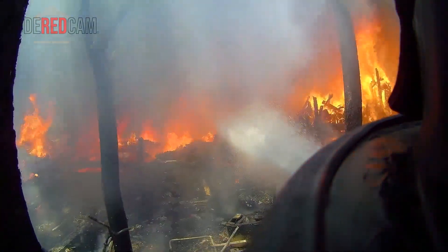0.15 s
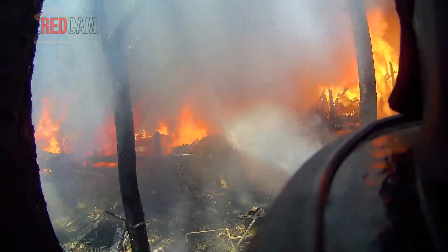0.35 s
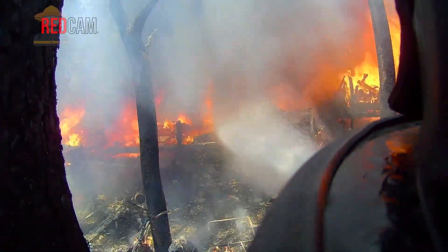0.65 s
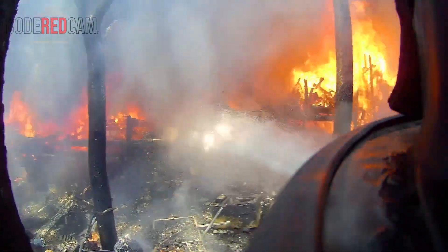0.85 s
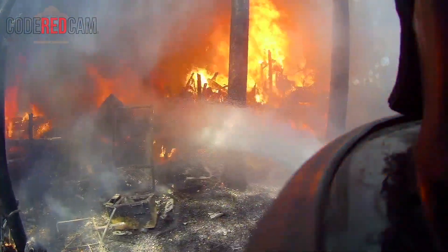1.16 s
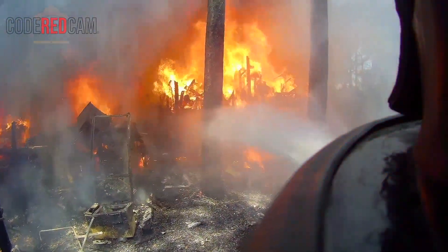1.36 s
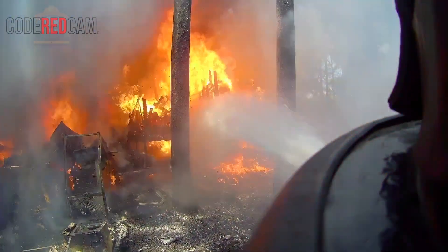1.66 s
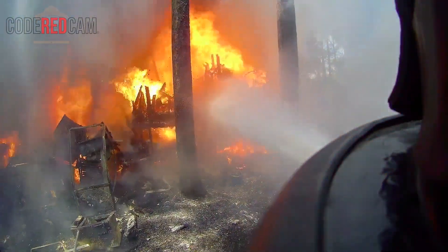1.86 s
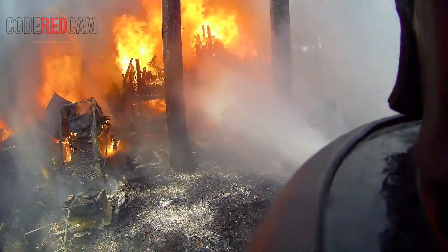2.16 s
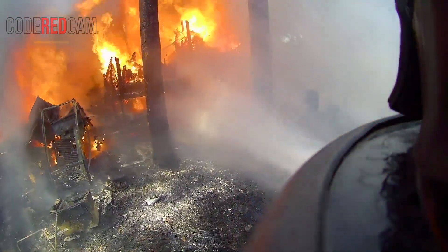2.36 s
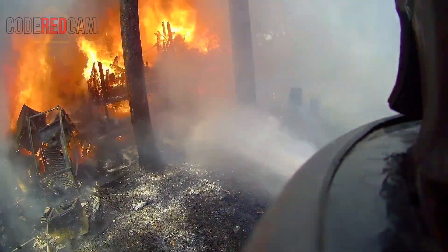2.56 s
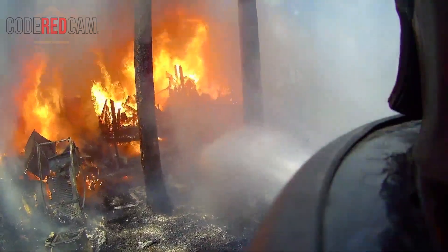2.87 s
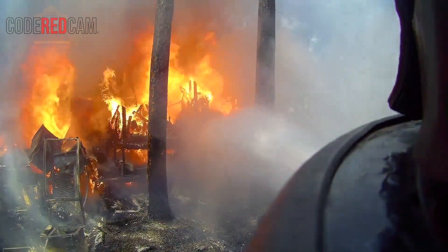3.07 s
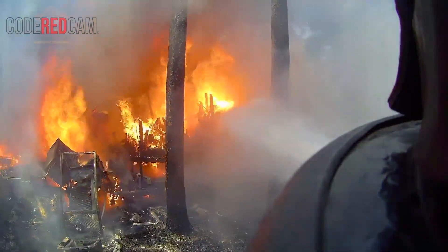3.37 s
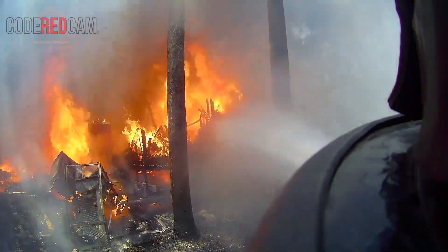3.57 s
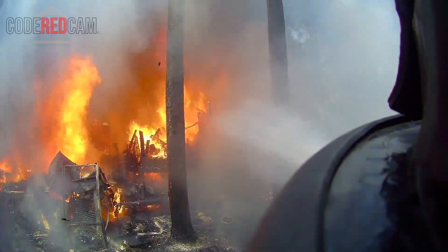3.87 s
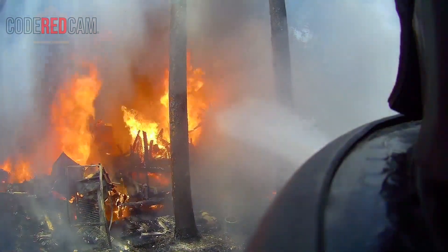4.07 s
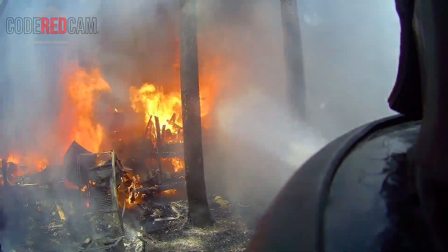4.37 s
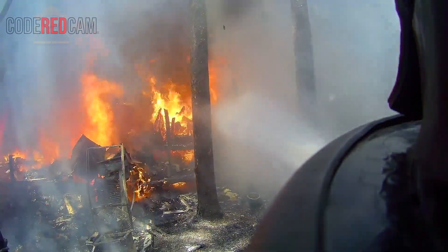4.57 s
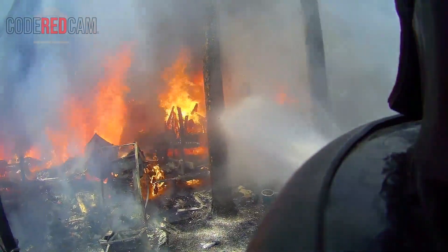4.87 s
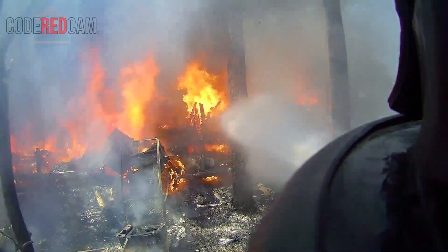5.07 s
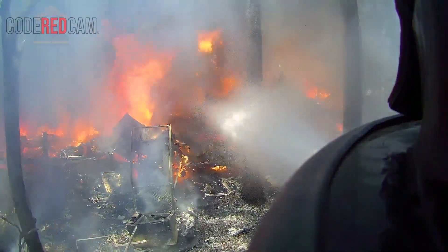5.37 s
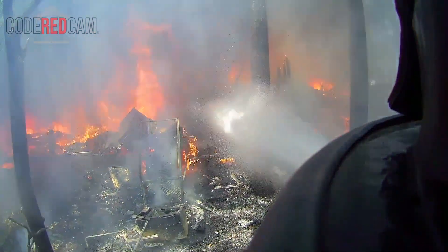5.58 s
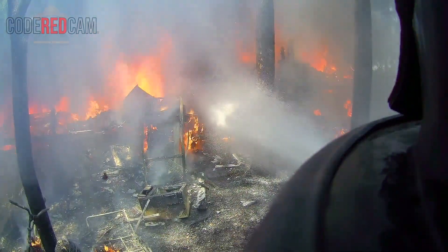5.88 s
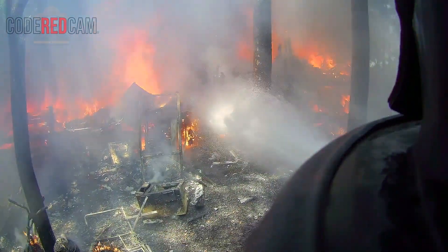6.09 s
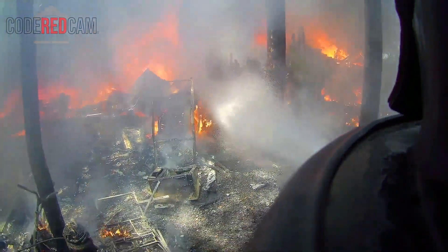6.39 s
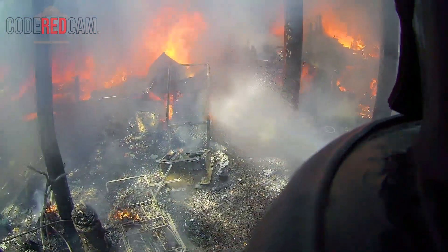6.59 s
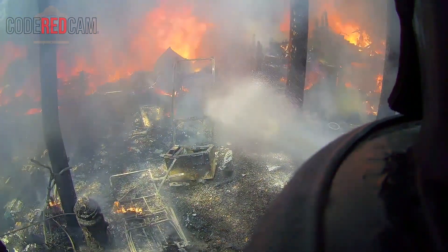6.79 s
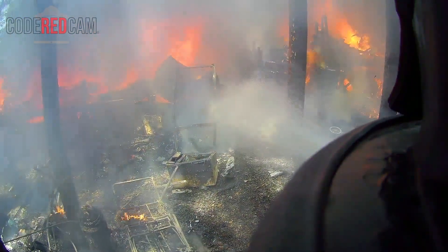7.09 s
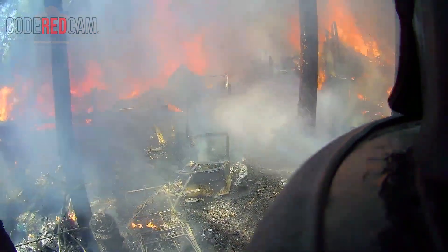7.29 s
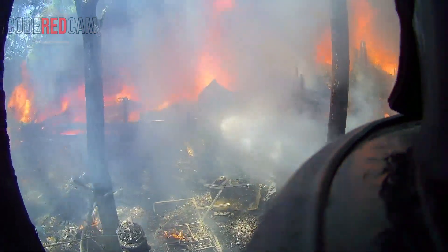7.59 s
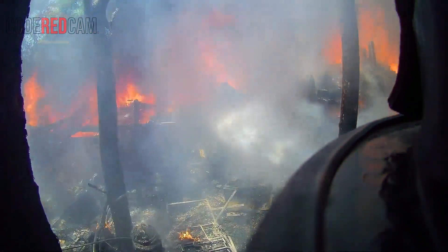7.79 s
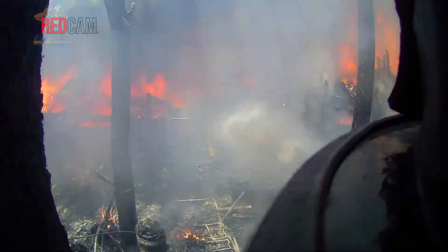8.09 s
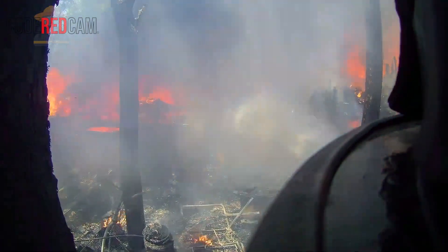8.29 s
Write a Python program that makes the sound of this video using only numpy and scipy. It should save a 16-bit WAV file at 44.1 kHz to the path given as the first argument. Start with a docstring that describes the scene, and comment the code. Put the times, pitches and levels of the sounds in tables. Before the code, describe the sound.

The hose is already spraying at 0 seconds and never stops: a dense, grainy mid-range rush with finer hiss, coloured boxy and nasal by a small weatherproof housing. A dark fire roar rises and falls below, alongside a low wavering pump drone and a second steady motor hum. From 1.0 to 1.7 the jet splashes harder, drums briefly on something, and low gusts slap the microphone port. Between 1.7 and 4.2 the spray wavers, with a few tiny ticks of lone drops and softer thumps near 2.9 and 3.3. Around 5.0 to 5.5 comes another splash with dull drumming, then heavy buffeting and a roar swell. From 6.2 the water turns brighter and finer; drops tick near 6.95, a gust thuds at 7.3, and splashes with drumming return around 7.9 and 8.2. It ends mid-spray near 8.4.

```python
"""A hose jet hisses and spatters on a brush fire, heard through a small microphone in a weatherproof housing.
The jet is many tiny impacts in three sizes; the fire's roar under it is filtered noise.
Gusts buffet the microphone port with low noise, and a pump engine and a second motor drone as wavering tones.
In passing the jet drums on things (short ringing noise), air slaps the port (dying swings),
and lone drops tick on the housing (single filtered clicks)."""
import sys
import numpy as np
from scipy import signal
from scipy.fft import rfft, irfft, next_fast_len
from scipy.io import wavfile

SR = 44100
rng = np.random.default_rng(int(sys.argv[2]) if len(sys.argv) > 2 else 0)


def unload_audio(sound):
    """Save the sound as a 16-bit wav file, at the path given as the first command line argument."""
    columns = np.transpose(np.atleast_2d(sound))
    # keep every value between -1 and 1, then stretch to whole-number steps
    steps = np.round(np.clip(columns, -1, 1) * 32767)
    wavfile.write(sys.argv[1], SR, steps.astype(np.int16))


N = 372204  # length of the scene in samples


def from_db(db):
    """Turn decibels into a gain."""
    return 10 ** (np.asarray(db) / 20)


def rms_one(x):
    """Scale a sound to an rms (average strength) of 1."""
    return x / np.sqrt(np.mean(x ** 2) + 1e-20)


def in_time(rows):
    """Draw straight lines between the rows of a table, giving each column a value at every sample."""
    times_s, *columns = np.transpose(rows)
    return [np.interp(np.arange(N) / SR, times_s, column) for column in columns]


def swells(events, edge):
    """Each event lifts its columns in a bell of its own length; the lifts add up in dB."""
    t = np.arange(0, N + 64, 64) / SR  # every 64th sample is enough for a slow curve
    total_db = 0
    for middle_s, length_s, *lifts_db in events:
        # edge: 2 = rounded swell, higher = squarer
        bell = np.exp(-np.abs((t - middle_s) / (length_s / 2)) ** edge)
        total_db = total_db + np.outer(lifts_db, bell)
    return [np.interp(np.arange(N) / SR, t, row) for row in total_db]


def drift(corner_hz):
    """Slow random wandering with an rms of 1: noise smoothed by two equal one-pole low-passes."""
    step = 40  # samples between the slow values
    r = np.exp(-2 * np.pi * corner_hz * step / SR)
    noise = rng.standard_normal(N // step + 2002)
    slow = signal.lfilter([1], [1, -2 * r, r * r], noise)[2000:]  # skip the filter's start
    return np.interp(np.arange(N) / step, np.arange(len(slow)), rms_one(slow))


def coloured(x, spectrum):
    """Filter x with the gain curve of a table, making each pitch region stronger or weaker."""
    size = next_fast_len(N)
    hz, db = np.transpose(spectrum)
    log_f = np.log(np.fft.rfftfreq(size, 1 / SR) + 1)  # +1 avoids log(0)
    gain = from_db(np.interp(log_f, np.log(hz), db))
    return irfft(rfft(x, size) * gain, size)[:N]


# hollows of the housing, which boost or weaken a band: (f/Hz, width/Hz, level/dB)
HOUSING_CAVITIES = [(779, 244, -10), (1430, 1130, 3), (2887, 300, -17.5), (3643, 320, 7.5), (4620, 150, 10),
                    (5360, 510, 7), (5980, 200, -8.5), (7240, 550, 6), (8580, 490, 10)]


def housing(x):
    """The air spaces of the housing colour sound: one peak or dip filter for each cavity."""
    for hz, width_hz, db in HOUSING_CAVITIES:
        middle = -2 * np.cos(2 * np.pi * hz / SR)
        a = np.tan(np.pi * width_hz / SR)
        g = from_db(db / 2)
        x = signal.lfilter([1 + a * g, middle, 1 - a * g], [1 + a / g, middle, 1 - a / g], x)
    return x


def droplets(per_s, spread_db):
    """Water hits at random moments, a few hits much stronger than the rest."""
    sizes = from_db(spread_db * np.minimum(rng.exponential(1, N), 5))
    signs = rng.choice([-1, 1], N)
    return rms_one(sizes * signs * (rng.random(N) < per_s / SR))


# colours of the three water sounds before the housing: (f/Hz, level/dB)
STREAM_COLOUR = [(500, -22), (800, -8), (1100, -1), (1400, 4), (1800, -3.5), (2400, -12.5), (3500, -43),
                 (4500, -54), (6000, -90)]
SPATTER_COLOUR = [(1200, -6.5), (1800, -5.5), (2400, 1.5), (2700, 0), (3500, -8.5), (3900, -15),
                  (4300, -35.5), (6000, -70)]
MIST_COLOUR = [(2000, -34), (2900, 25.5), (3500, 22.5), (3900, 2.5), (4400, -10), (5400, 1.5), (6500, 1),
               (7400, 1), (8000, -14), (10000, -12), (14000, -22)]
# the wandering jet, before splashes and sputter: (t/s, stream level/dB, spray fineness level/dB)
JET_FLOW = [(0.0, -41, -5.2), (1.31, -38.5, 1.5), (2.0, -41.5, 1.2), (2.37, -37.5, 2.2), (2.8, -38.5, 2.2),
            (3.34, -36, 1.6), (4.16, -41.5, 1.3), (5.29, -38, 0.1), (6.06, -39.5, 3.7), (6.25, -35.5, 0.6),
            (7.99, -36.5, 1.8), (8.44, -38, 2)]
# the jet breaks up on a trunk or heap as it crosses:
# (middle t/s, length t/s, swell level/dB, added fineness level/dB)
JET_SPLASHES = [(0.3, 0.31, 1.5, 8), (1.0, 0.31, 3, 2), (1.09, 0.11, 5, 3), (1.385, 0.19, 2.5, 7),
                (1.62, 0.49, 2, 2), (2.3, 0.34, 1.5, 3), (2.55, .15, 1.5, 0.5), (3.22, 0.15, 2, -1.5),
                (5.1, 0.2, 5, 4), (5.27, 0.065, 2.5, -0.5), (6.3, .22, -0.5, 7.5), (6.48, .1, -0.5, 5.5),
                (6.8, 0.34, 0.5, 6), (7.05, 0.32, -2, 8), (7.3, .25, 1, 6), (7.74, 0.39, 1, 7),
                (7.91, 0.072, 5, -6), (8.14, 0.19, 3.5, 6.5)]
# how the finer water follows the jet: (rest level/dB, share of the stream's swing, share of the fineness)
SPATTER_FOLLOW = (-55.5, 1.24, 0.85)
MIST_FOLLOW = (-62, 0.57, 1.03)


def jet():
    """Three sizes of water noise, each following flow and splashes in its own way; all sputter together."""
    stream_rest_db = -40
    flow_db, flow_fine_db = in_time(JET_FLOW)
    splash_db, splash_fine_db = swells(JET_SPLASHES, edge=3.1)
    stream_db = flow_db + splash_db
    fine_db = flow_fine_db + splash_fine_db

    def follow(rest_db, swing, fine):
        return rest_db + swing * (stream_db - stream_rest_db) + fine * fine_db

    spatter_db = follow(*SPATTER_FOLLOW)
    mist_db = follow(*MIST_FOLLOW)

    stream = rms_one(housing(coloured(droplets(20000, spread_db=2.0), STREAM_COLOUR)))
    spatter = rms_one(housing(coloured(droplets(9000, spread_db=4.0), SPATTER_COLOUR)))
    mist = rms_one(housing(coloured(droplets(9000, spread_db=2.0), MIST_COLOUR)))

    # a shared sputter, plus a flicker of its own for each size, in dB
    sputter = drift(7.1)
    return (stream * from_db(stream_db + 0.48 * sputter + 1.3 * drift(17))
            + spatter * from_db(spatter_db + 0.64 * sputter + 0.5 * drift(25))
            + mist * from_db(mist_db + 0.63 * sputter + 1.6 * drift(18)))


# colour of the roar before the housing: (f/Hz, level/dB)
ROAR_COLOUR = [(60, -10), (150, 3.5), (300, 3.5), (500, -3), (650, -11), (900, -17), (1400, -35),
               (3000, -100)]
# rise and fall of the roar, before its flicker: (t/s, level/dB)
ROAR_LEVEL = [(0, -45.5), (.42, -39), (.6, -43), (1.1, -38.5), (1.3, -45), (1.63, -41), (1.95, -43),
              (2.4, -41), (2.85, -44.5), (3.2, -41), (3.45, -43.5), (4.1, -46), (5.22, -46), (5.38, -39),
              (5.52, -45), (6.9, -42), (8.15, -39.5), (8.44, -43.5)]


def fire():
    """The fire's roar is low noise heard through the housing, with a small random flicker."""
    roar = rms_one(housing(coloured(rng.standard_normal(N), ROAR_COLOUR)))
    return roar * from_db(in_time(ROAR_LEVEL)[0] + 0.5 * drift(10.0))


# colours of the deep thumps and the quicker flutter: (f/Hz, level/dB)
THUMP_COLOUR = [(8, -4.5), (20, -3), (45, -4), (70, -11), (150, -40), (800, -110)]
FLUTTER_COLOUR = [(40, -24), (70, 1), (110, -3), (200, -10), (400, -31), (800, -70), (2000, -110)]
# gusts over the port: (middle t/s, length t/s, thump swell level/dB, flutter swell level/dB)
AIR_GUSTS = [(0.54, 0.1, 8, 2), (1.05, 0.35, 5, 6), (1.15, 0.12, -2, 6), (1.46, 0.079, 11, 9.5),
             (1.62, 0.27, 4, 10.5), (1.86, 0.16, 7, 7), (2.25, 0.32, 4.5, 0), (2.88, 0.36, 6, 6),
             (3.34, 0.093, 9.5, 9), (4.63, 0.15, 8, 3.5), (4.86, 0.11, 5, 7), (5.05, 0.17, 14, 9),
             (5.44, 0.21, 12.5, 14), (5.73, 0.13, 3, 4), (5.97, 0.11, 8, 4), (6.86, 0.53, 5, 2),
             (7.36, 0.17, 10.5, 8.5), (8.38, 0.24, -1, .6)]


def buffeting():
    """Moving air shakes the port itself, so this lumpy low noise does not pass the housing."""
    calm_thump_db, calm_flutter_db = -41, -41.5
    thump_db, flutter_db = swells(AIR_GUSTS, edge=1.66)
    thump = rms_one(coloured(rng.standard_normal(N), THUMP_COLOUR))
    flutter = rms_one(coloured(rng.standard_normal(N), FLUTTER_COLOUR))
    lumps = drift(18.3)
    return (thump * from_db(calm_thump_db + thump_db + 2.0 * lumps)
            + flutter * from_db(calm_flutter_db + flutter_db + 2.1 * lumps))


# second harmonic of the pump engine's firing rate: (t/s, f/Hz)
PUMP_HARMONIC = [(0, 139.4), (3, 139.0), (5.5, 138.2), (8.44, 137.9)]
# tones turning with the pump engine, rms before wavering: (multiple of that harmonic, level/dB)
PUMP_PARTS = [(1 / 2, -49.5), (5 / 6, -53.5), (0.98, -43.5), (7 / 6, -58), (4 / 3, -53.5), (1.642, -51.5),
              (2.023, -56.5)]
# steady-pitched tones of the second motor, rms before wavering: (f/Hz, level/dB)
MOTOR_PARTS = [(60.5, -44.5), (121.1, -45)]


def engines():
    """Turning engines make sine tones, which waver a little on their way through the hot air."""
    pump_cycles = np.cumsum(in_time(PUMP_HARMONIC)[0]) / SR
    t = np.arange(N) / SR
    tones = [(multiple * pump_cycles, db) for multiple, db in PUMP_PARTS]
    tones += [(hz * t, db) for hz, db in MOTOR_PARTS]
    out = 0
    for cycles, db in tones:
        gain = np.sqrt(2) * from_db(db + 1.14 * drift(3.4))  # sqrt(2) turns rms into peak
        phase = 2 * np.pi * (cycles + rng.random()) + 0.79 * drift(1.54)
        out = out + gain * np.sin(phase)
    return out


# the jet drums on a trunk or on wreckage in passing; rms before shaping and housing:
# (middle t/s, level/dB, ring f/Hz, width/Hz, length t/s)
DRUM_HITS = [(1.097, -34, 1600, 600, 0.04), (1.33, -39, 3520, 500, 0.06), (1.372, -39.5, 2400, 1800, 0.15),
             (2.964, -36, 700, 800, .008), (5.054, -47, 3500, 400, 0.061), (5.108, -33, 1740, 1290, 0.1),
             (5.154, -41, 3600, 300, 0.034), (7.868, -40, 500, 90, 0.1), (8.18, -30, 1260, 700, 0.081)]


def drumming():
    """Each thing struck rings at one pitch region: a short, square-edged burst of resonant noise."""
    t, out = np.arange(N) / SR, 0
    for middle_s, level_db, hz, width_hz, length_s in DRUM_HITS:
        b, a = signal.iirpeak(hz, hz / width_hz, fs=SR)
        once = signal.lfilter(b, a, rng.standard_normal(N))
        ring = rms_one(signal.lfilter(b, a, once))
        burst = np.exp(-((t - middle_s) / (length_s / 2)) ** 4)
        out = out + from_db(level_db) * ring * burst
    # the drumming is dull: a steep low-pass keeps it below about 4 kHz
    low_pass = signal.cheby2(8, 45, 4200, fs=SR, output="sos")
    return signal.sosfilt(low_pass, housing(out))


# sudden slaps of air on the port, level before the swing's rise and fade: (t/s, level/dB, ring f/Hz)
AIR_SLAPS = [(1.129, -13.5, 64), (1.199, -17.5, 76.4), (1.437, -12, 67.5), (1.53, -20, 50.4),
             (1.662, -15.5, 66), (1.842, -23, 79), (2.834, -19, 111), (2.954, -19.5, 90.5),
             (3.311, -17, 127), (4.121, -21.5, 60.4), (4.859, -17, 84), (4.94, -18, 90), (5.032, -23, 54),
             (5.079, -19, 46.5), (5.393, -14, 109), (5.527, -19, 103), (7.299, -22.5, 61),
             (7.989, -17.5, 120)]


def slaps():
    """Each slap kicks the port membrane in or out, and it swings for a few dying cycles."""
    after = np.arange(SR // 5) / SR  # seconds after the kick
    out = np.zeros(N + SR)
    signs = rng.choice([-1, 1], len(AIR_SLAPS))
    for (start_s, level_db, hz), sign in zip(AIR_SLAPS, signs):
        rise = 1 - np.exp(-after / 0.0025)
        fade = np.exp(-after * hz / 1.12)
        swing = np.sin(2 * np.pi * hz * after) * fade * rise
        start = round(start_s * SR)
        out[start:start + len(after)] += sign * from_db(level_db) * swing
    return out[:N]


# lone drops on the housing, click strengths before the filters: (t/s, tick level/dB, tap level/dB)
LONE_DROPS = [(1.7084, -47, -10), (1.951, -37, -30), (2.0043, -42, -25), (2.6569, -37, -28),
              (2.789, -31, -20), (3.4496, -37, -15), (3.9235, -36, -19), (4.0512, -38, -16),
              (4.2103, -46, -20), (6.9386, -40, -14), (6.9706, -38, -18)]


def drops():
    """Each drop is one sharp contact: a bright tick and a duller tap of the shell."""
    times_s, tick_db, tap_db = np.transpose(LONE_DROPS)
    at = np.round(times_s * SR).astype(int)
    tick, tap = np.zeros((2, N)) + 1e-18  # the tiny offset keeps the filters quick
    tick[at] = from_db(tick_db)
    tap[at] = from_db(tap_db)
    bright = signal.butter(2, [5200, 8500], "band", fs=SR, output="sos")
    dull = signal.cheby2(6, 45, [1900, 4200], "band", fs=SR, output="sos")
    return housing(signal.sosfilt(bright, tick) + signal.sosfilt(dull, tap))


def scene():
    """Add up everything that reaches the one microphone."""
    return (jet() + fire() + buffeting() + engines() + drumming() + slaps() + drops())[None]


# colour of the preamplifier's hiss: (f/Hz, level/dB)
HISS_COLOUR = [(500, -22), (4000, 3), (9000, 0), (12300, -1), (14200, -7.5)]


def record(dry):
    """The preamplifier adds its own faint noise; a steep low-pass then cuts the top."""
    hiss_db, cutoff_hz = -70.5, 14270  # hiss rms before the cut
    hiss = from_db(hiss_db) * rms_one(coloured(rng.standard_normal(N), HISS_COLOUR))
    low_pass = signal.ellip(14, .3, 70, cutoff_hz, fs=SR, output="sos")
    return signal.sosfilt(low_pass, dry + hiss)


dry = scene()
out = record(dry)
unload_audio(out)
```